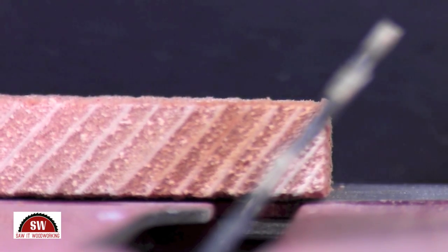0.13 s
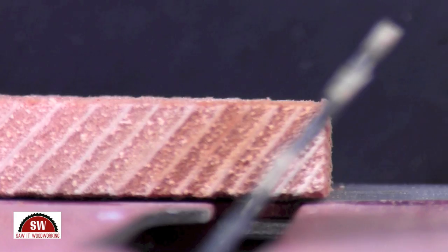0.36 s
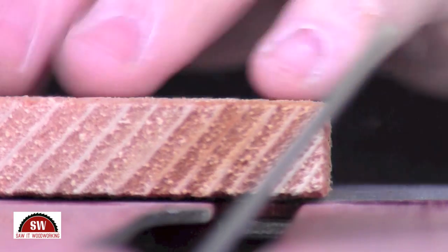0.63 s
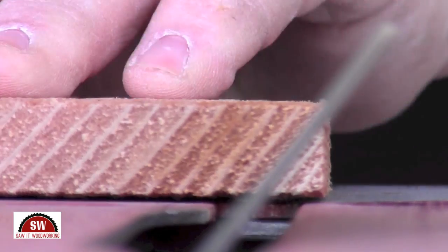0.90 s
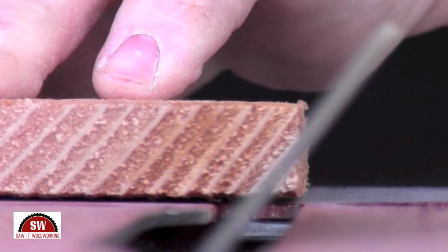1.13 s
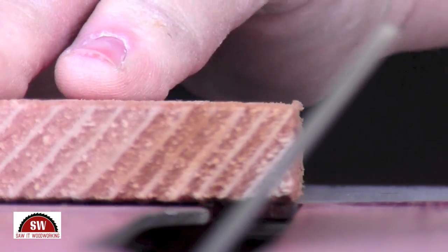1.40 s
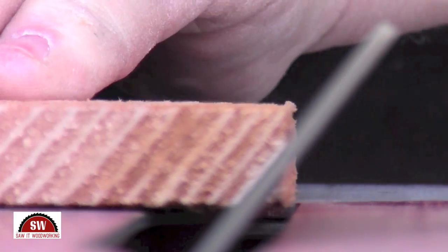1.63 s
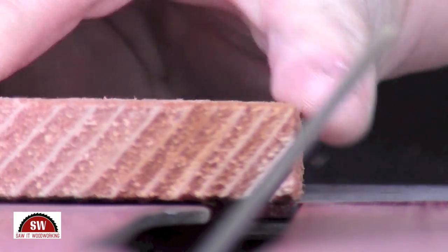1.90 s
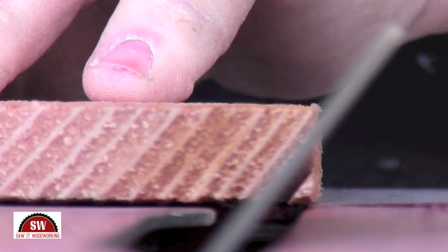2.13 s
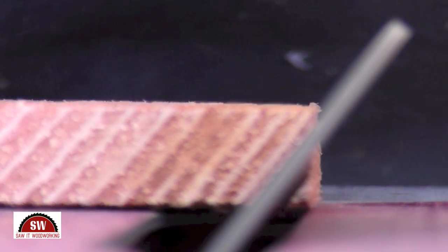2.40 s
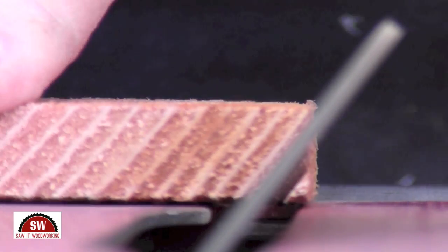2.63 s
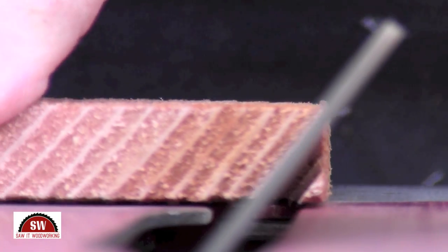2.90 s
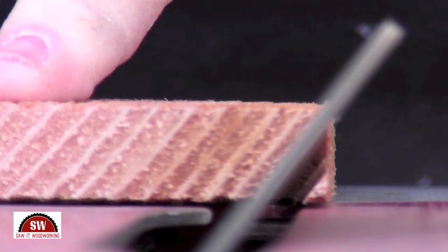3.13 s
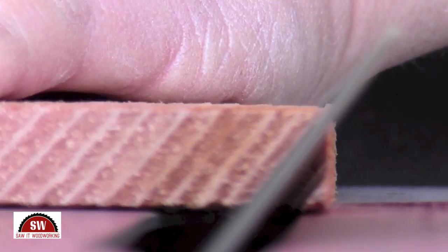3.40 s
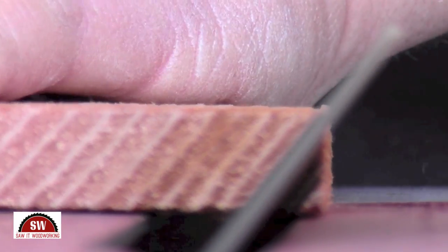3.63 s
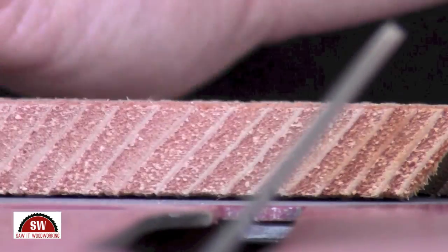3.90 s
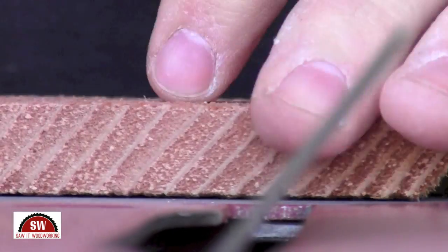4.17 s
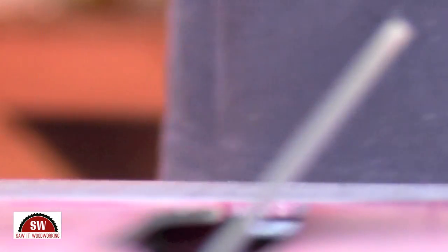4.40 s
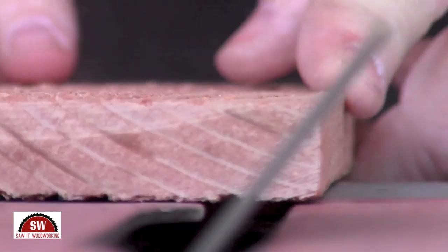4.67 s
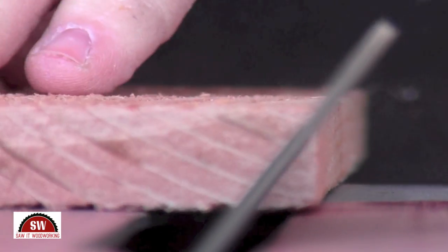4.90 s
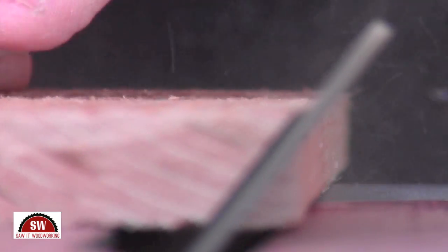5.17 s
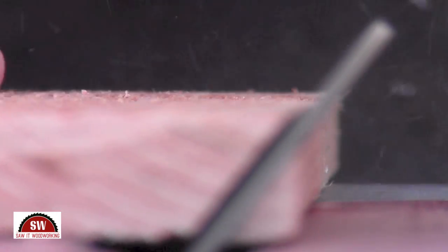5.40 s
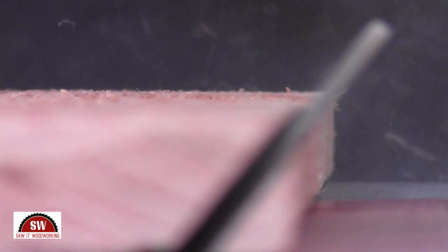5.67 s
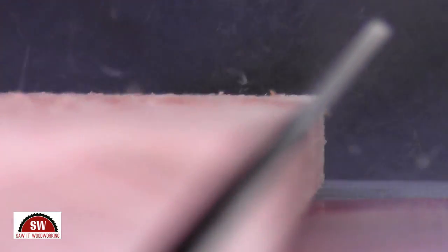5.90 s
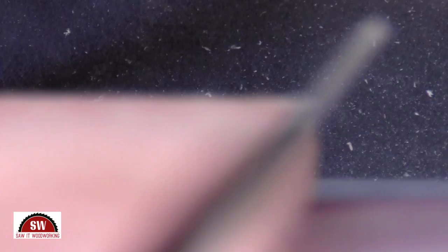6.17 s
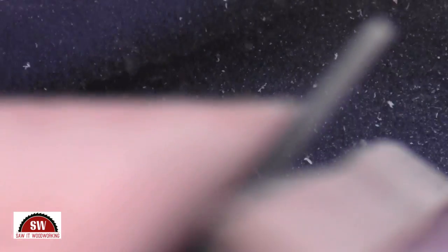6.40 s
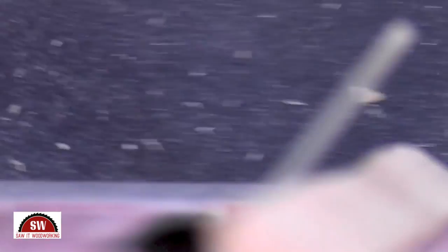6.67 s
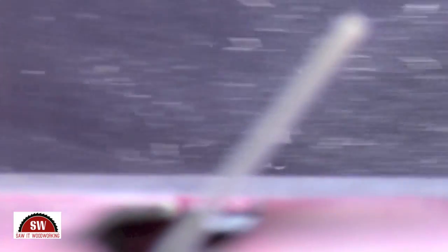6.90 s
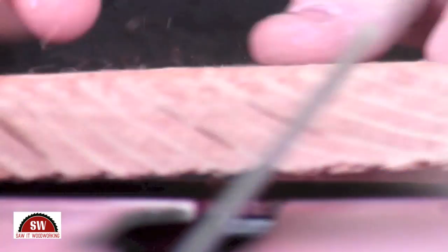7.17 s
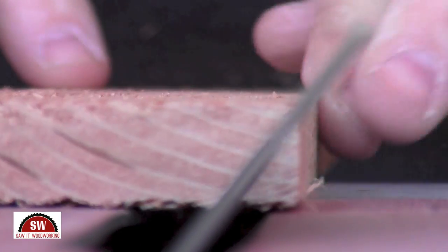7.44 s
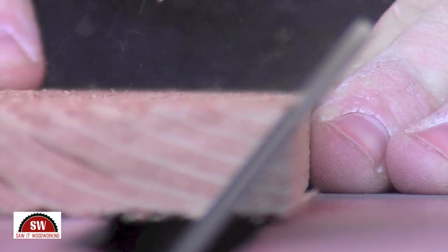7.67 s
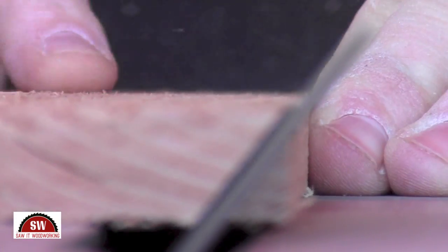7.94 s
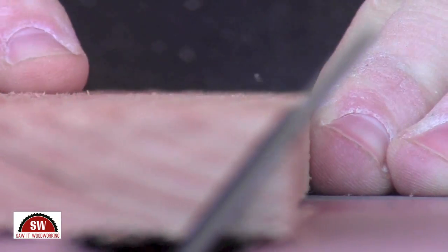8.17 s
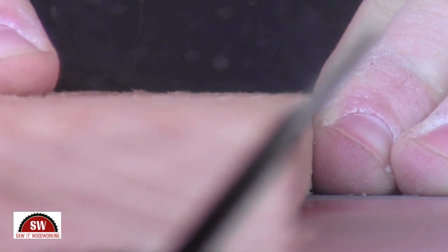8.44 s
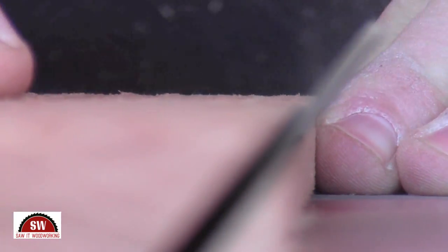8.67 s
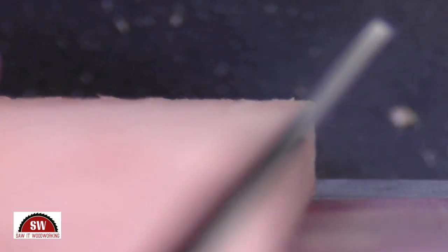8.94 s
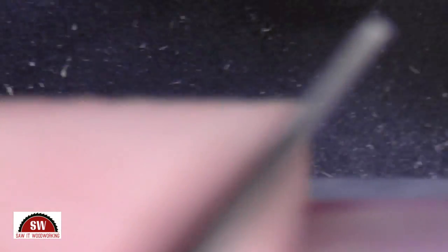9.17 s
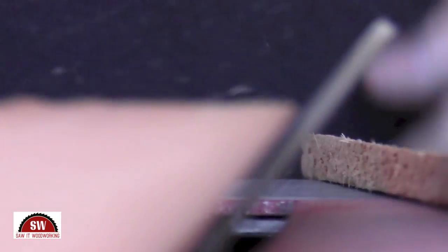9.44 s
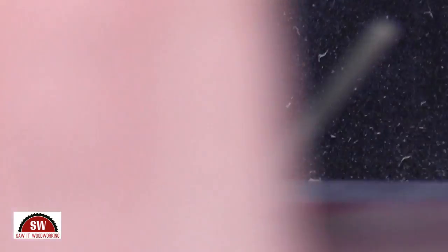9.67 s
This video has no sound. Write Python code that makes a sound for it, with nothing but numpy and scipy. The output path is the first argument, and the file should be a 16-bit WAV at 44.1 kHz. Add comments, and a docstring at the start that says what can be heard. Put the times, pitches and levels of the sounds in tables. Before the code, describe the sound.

A quiet workshop, close, dry and nearly mono. From 0 to 0.5 s there is low rumble, soft rustling, faint falling squeaks and two dull wooden knocks at about 0.2 and 0.35 s. A tiny hush follows, then a bright metallic clank at 0.59 s as a table saw kicks on. Its high whine shoots up in a fraction of a second inside a loud, bright, hissing roar of air and chips, then settles slowly, with small dips near 1.7, 2.5 and 3.5-3.9 s. From 4.9 to 6.6 s a board loads the blade: the whine sags unevenly and turns stronger and raspier, then recovers. A second cut from 7.5 to 9.4 s wavers similarly. At about 9.5 s the motor switches off; the whine glides downward amid continuing, boomier roar and brief metallic rings, ending around 9.8 s still spinning.

```python
"""A quiet workshop, heard close and dry on a nearly mono microphone pair: low rumble, two wooden knocks and
faint falling squeaks, then a hush. These are filtered noise, ringing modes and gliding partials.
A table saw kicks on with a clank; its tooth whine, sines locked to the tooth rate, climbs,
sags whenever wood loads the blade and slides down at switch-off.
Air and chips roar as noise through the resonances of cabinet and blade."""
import sys
import numpy as np
from scipy import signal
from scipy.fft import rfft, irfft, next_fast_len
from scipy.io import wavfile
from scipy.ndimage import uniform_filter1d

SR = 44100
rng = np.random.default_rng(int(sys.argv[2]) if len(sys.argv) > 2 else 0)


def makeup_ratio(level_db):
    """Linear amplitude ratio for a level in decibels (20 dB per factor of ten)."""
    decades = np.asarray(level_db, float) / 20
    return 10 ** decades


def generate_wav(sig):
    """Save sig (samples, or channels by samples) to the path in sys.argv[1] as 16-bit PCM at SR."""
    pcm = np.round(np.clip(np.atleast_2d(sig).T, -1, 1) * 32767).astype(np.int16)
    wavfile.write(sys.argv[1], SR, pcm)


N = 432621
END_S = N / SR
HUSH_S = 0.516  # the workshop sounds stop here
CLANK_S = 0.5885
ON_S, OFF_S = 0.6, 9.478  # motor switched on and off
FREE_HZ, LOADED_HZ = 3200, 3010  # tooth rate running free, and where the load counts as full


def colour(x, points, peaks=()):
    """Filter by (Hz, dB) points plus bell-shaped resonances; rms 1."""
    hz = np.maximum(np.fft.rfftfreq(x.shape[-1], 1 / SR), 1)
    f, db = np.transpose(points)
    shape = np.interp(np.log(hz), np.log(f), db)
    for centre, width, lift_db in peaks:
        shape = shape + lift_db / (1 + (2 * (hz - centre) / width) ** 2)
    y = irfft(rfft(x) * makeup_ratio(shape), x.shape[-1])
    return y / np.sqrt(np.mean(y ** 2))


def split(x, edges_hz):
    """Cut a sound into neighbouring bands that add back to the whole."""
    size = next_fast_len(x.shape[-1])
    hz, spec = np.fft.rfftfreq(size, 1 / SR), rfft(x, size)
    above = [1 / (1 + (e / np.maximum(hz, 1)) ** 8) for e in edges_hz]
    weights = -np.diff([np.ones_like(hz)] + above + [np.zeros_like(hz)], axis=0)
    return [irfft(spec * w, size)[..., :x.shape[-1]] for w in weights]


def band(hz, width):
    """Noise in one resonance; rms 1."""
    size = next_fast_len(N)
    f = np.fft.rfftfreq(size, 1 / SR)
    spec = rfft(rng.standard_normal(size))
    y = irfft(spec / (1 + (2 * (f - hz) / width) ** 2), size)[:N]
    return y / np.std(y)


def curve(rows, size=N):
    """Gate that is open while a table lasts, and the table's columns joined over time."""
    t = np.arange(size) / SR
    s, *columns = np.transpose(rows)
    gate = uniform_filter1d(1. * ((t >= s[0]) & (t <= s[-1])), 100, mode="nearest")
    return gate, [np.interp(t, s, c) for c in columns]


def walk(rate, size=N):
    """Random levels held 1 / rate s and slewed twice; spread near 1."""
    k = int(SR / rate)
    held = np.repeat(rng.standard_normal(size // k + 1), k)
    return 1.3 * uniform_filter1d(uniform_filter1d(held, k), k)[:size]


def tone(rows, wobble_hz, flutter_db, size=N):
    """A wavering partial on (s, Hz, dB rms) rows."""
    gate, (hz, db) = curve(rows, size)
    phase = 2 * np.pi * np.cumsum(hz + wobble_hz * walk(150, size)) / SR
    level = np.sqrt(2) * makeup_ratio(db + flutter_db * walk(80, size))
    return np.pad(gate * level * np.sin(phase), (0, N - size))


def flare(peak_s, half_s, hz, fall, db):
    """Rows of a short partial that swells by 14 dB, glides down and fades."""
    return [(peak_s + way * half_s, hz - way * half_s * fall, db - abs(way) * 14) for way in (-1, 0, 1)]


def strike(start, level_db, modes, rattle, rise):
    """Modes rung by a blow; rattle (dB) keeps shaking their levels as they die; rise in s."""
    t = np.maximum(np.arange(SR) / SR - start, 0)
    ring = 0
    for hz, db, t60 in modes:
        level = makeup_ratio(db + rattle * walk(119.7, size=SR))
        ring = ring + level * np.exp(-np.log(1000) * t / t60) * np.sin(2 * np.pi * hz * t)
    ring = ring * (1 - np.exp(-t / rise))
    return np.pad(makeup_ratio(level_db) * ring, (0, N - SR))


def stereo(mid, side):
    """Left and right from mid and side."""
    return np.array([mid + side, mid - side])


def spread(bed):
    """Pad a mid and side pair of noises to full length, the side turned down."""
    mid, side = np.pad(bed, ((0, 0), (0, N - bed.shape[1])))
    return stereo(mid, makeup_ratio(-10.5) * side)


def until_hush():
    """Gain that closes over the last 130 samples before the hush."""
    return np.clip((HUSH_S * SR - np.arange(N)) / 130, 0, 1)


# relative spectrum of the workshop noise: pitch_hz, density_db (per Hz)
SHOP_COLOUR = [(18, -48), (40, -22), (85, -3), (340, -13.5), (1000, -15.5), (2300, -19), (3200, -25.5),
               (8500, -31), (11500, -39), (13000, -50), (15500, -70)]
# scuffs that swell each band: start_s, rumble_db, rustle_db, hiss_db
SCUFFS = [(.199, -51, -45.5, -57), (.215, -60, -54, -50), (.245, -60, -53, -60), (.348, -47, -53.5, -67)]


def room():
    """Rumble, rustle and hiss are noise bands that swell separately and die away after each scuff."""
    t = np.arange(SR) / SR
    gains = []
    # steady level (dB) and decay after a scuff (t60 s) of rumble, rustle and hiss
    for column, (db, t60) in enumerate([(-51.5, 0.1), (-60.5, 0.56), (-70.5, 0.17)], 1):
        power = makeup_ratio(db + 2.0 * walk(26.7, SR)) ** 2
        for row in SCUFFS:
            decay_db = 60 * np.abs(t - row[0]) / t60
            power = power + (t > row[0]) * makeup_ratio(row[column] + 2.0 * walk(200, SR) - decay_db) ** 2
        gains.append(np.sqrt(power))
    gains[0] = gains[0] * np.clip((HUSH_S - t) / 0.021, 0, 1)  # rumble dies away just before the hush
    bands = split(colour(rng.standard_normal((2, SR)), SHOP_COLOUR), (700, 4000))
    bed = sum(gain * part / np.std(part) for gain, part in zip(gains, bands))
    return spread((np.arange(SR) < HUSH_S * SR) * bed)


# falling squeaks: peak_s, half_length_s, pitch_hz (at the peak), fall_hz_per_s, level_db
SQUEAKS = [(.01, .05, 2540, 1500, -47.5), (.02, 0.044, 2780, 1000, -54), (.005, 0.07, 1450, 600, -57),
           (0.081, .035, 2440, 3000, -56), (0.092, 0.021, 1090, 500, -51), (.09, .02, 5750, 1000, -65),
           (.115, .03, 2150, 1500, -60), (0.178, 0.039, 2140, 4020, -50), (0.436, .035, 2915, 3200, -55),
           (0.423, .055, 2630, 5000, -59), (.485, .025, 2690, 3500, -47.5), (.508, .022, 2600, 3490, -45)]


def squeaks():
    """Short wavering partials glide down; a fast random level makes them grainy."""
    lines = sum(tone(flare(*row), wobble_hz=24, flutter_db=3.0, size=SR) for row in SQUEAKS)
    grainy = until_hush() * (1 + 0.3 * walk(500)) * lines
    return stereo(grainy, makeup_ratio(-17) * grainy)


# knocks: start_s, level_db
KNOCKS = [(.199, -40), (0.348, -44)]
# modes of the wood: pitch_hz, level_db (relative to the knock), t60_s
WOOD = [(271, -2.5, 0.22), (351, -1, 0.23), (454, -3, .15), (630, 0, 0.065), (820, -9, 0.094),
        (1073, -6, 0.092), (1380, -3, 0.12), (2280, -14, 0.078), (3515, -15, 0.1)]


def knocks():
    """Blows ring the decaying modes of wood, in the middle of the pair."""
    return until_hush() * sum(strike(s, db, WOOD, rattle=3.7, rise=0.0025) for s, db in KNOCKS)


# relative spectrum of the hush: pitch_hz, density_db (per Hz)
HUSH_COLOUR = [(24, -60), (60, -30), (450, -24), (650, -3), (900, -2), (1200, -10), (1550, -7), (2500, -11),
               (3200, -20), (10000, -27), (15500, -28)]


def hush():
    """Faint coloured noise up to the moment the motor is switched on."""
    t = np.arange(SR) / SR
    noise = colour(rng.standard_normal((2, SR)), HUSH_COLOUR)
    return spread(makeup_ratio(-60) * noise * (t > HUSH_S) * (t < ON_S))


# modes of the start clank: pitch_hz, level_db (relative to the clank), t60_s
CLANK = [(1000, -31, .08), (1390, -22, .15), (1960, -12.5, 0.22), (2200, -20, 0.23), (2410, -8, 0.25),
         (2570, -10, 0.21), (2810, 4, 0.095), (2900, -1, 0.12), (3340, -21, .15), (3760, -12, 0.12),
         (5170, -7, .05), (6804, -12, .03)]


def clank():
    """The start rings metallic modes that rattle unevenly as they die."""
    return strike(CLANK_S, -20.5, CLANK, rattle=3.5, rise=0.0006)


# crunch of the start clank, one row: pitch_hz, width_hz, level_db, t60_s
CRUNCH = (2600, 1298, -36, 0.21)


def crunch():
    """One resonant band of noise bursts with the clank and decays."""
    hz, width, db, t60 = CRUNCH
    since = np.arange(N) / SR - CLANK_S
    return (since > 0) * makeup_ratio(db - 60 * np.abs(since) / t60 + 1.9 * walk(150)) * band(hz, width)


# wood brushes the blade: deepest_s, sag_hz, slowing_s
BRUSHES = [(1.67, 41.7, .11), (2.42, 27.83, .1), (2.62, 41.7, .1), (3.55, 50, 0.16), (3.71, 45.2, 0.081),
           (3.875, 45, 0.026)]
# two rip cuts with uneven feed, each a list of: time_s, sag_hz (of the tooth rate)
CUTS = [
    [(4.9, 0.5), (4.97, 46), (5.05, 126), (5.26, 239), (5.36, 241), (5.46, 119), (5.61, 185.5), (5.77, 140),
     (5.84, 200), (5.97, 249.5), (6.2, 191), (6.38, 176), (6.48, 71), (6.59, 14.5), (6.69, -1.5)],
    [(7.46, 1), (7.58, 81), (7.69, 157.5), (7.81, 189.5), (7.89, 119.5), (7.98, 114), (8.04, 48.5),
     (8.22, 149), (8.3, 149.5), (8.55, 195.5), (8.76, 146), (9.12, 187), (9.24, 138.5), (9.32, 60.5),
     (9.45, 4.5), (9.47, 0)],
]


def blade():
    """Gate, tooth rate and load (0 free, 1 full): fast run-up, slow warm-up, sags, exponential coast."""
    run_up_s, start_hz, coast_per_s = 0.062, 1500, 2.3
    cold_sag_hz, warm_up_s, recover_s = 55.2, 1.7, 0.11
    t = np.arange(N) / SR
    since = np.maximum(t - ON_S, 0)
    sag = cold_sag_hz * np.exp(-since / warm_up_s)
    for s, hz, slowing in BRUSHES:
        slowed = np.clip(1 + (t - s) / slowing, 0, 1)
        recovering = np.exp(-np.abs(t - s) / recover_s)
        sag = sag + hz * np.where(t < s, slowed, recovering)
    for rows in CUTS:
        sag = sag + np.interp(t, *np.transpose(rows), 0, 0)
    hz = FREE_HZ - sag - (FREE_HZ - start_hz) * np.exp(-since / run_up_s)
    hz = hz * np.exp(-coast_per_s * np.maximum(t - OFF_S, 0))
    load = np.clip(sag / (FREE_HZ - LOADED_HZ), 0, 1)
    return curve([(ON_S,), (END_S,)])[0], hz, load


# roar over time: time_s, level_db (before a fixed 2 dB lift)
ROAR_LEVEL = [(.59, -29.5), (.8, -29.5), (1.72, -30.5), (2.18, -29.5), (2.54, -30.5), (3.62, -30),
              (3.83, -30.5), (4.31, -30), (4.85, -30), (5.75, -31.5), (6.42, -31), (6.93, -29.5),
              (7.5, -30.5), (9.07, -32.5), (9.47, -30), (9.81, -29.5)]
# relative spectrum of the roar: pitch_hz, density_db (per Hz)
ROAR_COLOUR = [(18, -68), (30, -38.5), (250, -40.5), (450, -30), (640, -20.5), (1100, -20), (1900, -14.5),
               (2150, -8.5), (2700, -8.5), (3300, -8.5), (4500, -8.5), (5600, -7.5), (10000, -5.5),
               (14800, -3), (16000, -8)]
# resonances and dips of cabinet and blade: pitch_hz, width_hz, lift_db
BODY = [(1140, 300, 6.5), (1550, 125, 5.5), (2594, 380, 3.5), (2850, 87, 4), (3607, 147, 9), (3700, 89, -5),
        (6400, 420, 6), (7230, 250, 5.5), (7520, 200, -4.5), (7930, 370, 5), (8970, 420, 1.5),
        (9560, 470, 2.5), (10400, 82, -8), (11490, 1240, 4.5), (12500, 250, -5), (12900, 150, 2.5),
        (13900, 300, 0), (14100, 150, -6)]


def roar():
    """Turbulent air and chips through the body; each band flickers a little on its own."""
    gate, (level_db,) = curve(ROAR_LEVEL)
    since = np.maximum(np.arange(N) / SR - CLANK_S, 0)
    level_db = level_db + 7 * np.exp(-since / 0.0058)  # the kick
    # the cabinet booms harder at the kick and as the blade slows
    slow = np.clip(2 - 2 * blade()[1] / FREE_HZ, 0, 1) ** 2
    boom_db = -2.5 + 4 * np.exp(-since / 0.041) + 4.5 * slow + 1.0 * walk(20)
    boom_hz, boom_width_oct = 1160, 1.74
    # chips striking the guard make the noise slightly grainy
    grain = makeup_ratio(0.35 * walk(900))
    air = colour(grain * rng.standard_normal((2, N)), ROAR_COLOUR, BODY)
    edges = 500 * 2 ** np.arange(0, 5, .5)
    centres = np.append(edges[0] / 2, edges) * 2 ** .25
    out = 0
    for hz, part in zip(centres, split(air, edges)):
        boom = np.exp(-(np.log2(hz / boom_hz) / boom_width_oct) ** 2) * boom_db
        out = out + part * makeup_ratio(boom + 0.35 * walk(7.2) + 0.38 * walk(25))
    out = gate * makeup_ratio(level_db + 2.0) * out
    return stereo(out[0], makeup_ratio(-36.5) * out[1])


# how strongly the tooth tone radiates at each pitch: pitch_hz, level_db (rms, before the slow change)
TOOTH_TONE = [(1500, -44), (1590, -45), (1700, -56), (1800, -43), (2000, -49), (2120, -32), (2250, -46),
              (2390, -33), (2520, -30), (2700, -33), (2830, -33.5), (2930, -45), (2970, -45.5), (3015, -42),
              (3080, -43.5), (3130, -43.5), (3165, -40.5), (3200, -42)]
# slow change of the tooth tone: time_s, change_db
TOOTH_LEVEL = [(.8, 4), (1.5, 1), (4.3, 0.5), (4.6, -3.5), (5.3, 0.5), (5.42, 3), (5.8, 0), (6.2, -0.5),
               (7.0, -1), (7.6, -4), (8.2, -0.5), (8.4, -1), (9.48, -1.5)]
# how strongly its octave radiates: pitch_hz, level_db (rms)
OCTAVE_TONE = [(3000, -43), (3400, -44), (3590, -35), (4000, -47), (4240, -44), (4500, -56), (4770, -38),
               (5020, -38), (5400, -48), (5660, -45), (5860, -53), (5930, -45), (6030, -38), (6160, -40.5),
               (6250, -35), (6330, -37.5), (6400, -33.5)]
# how strongly the upper tooth overtones radiate: pitch_hz, level_db (rms)
OVERTONES = [(4000, -52), (5300, -41), (5900, -48), (6300, -44), (7500, -54), (9000, -56), (9450, -51),
             (9600, -44), (11000, -55), (12100, -46.5), (12700, -44), (16000, -60)]
# gear and rotor lines, as multiples of the tooth rate
GEAR_ORDERS = [.205, .41, .68, .83, 2.2, 2.56]
# the same lines: level_db (rms at free speed), added_db (at full load)
GEARS = [(-74.5, 5), (-65.5, -4), (-64, 12.5), (-58, 7), (-65, -4), (-56, 7)]


def whine():
    """Teeth chop the air: tooth rate, its octave, overtones that flare at resonances, gear lines."""
    gate, hz, load = blade()
    # weaker while the motor pulls up, in the first second only
    run_up_db = (-6 + 1.5 * walk(62)) * (hz < LOADED_HZ) * (np.arange(N) < SR)
    first_db = np.interp(hz, *np.transpose(TOOTH_TONE)) + 1.1 * walk(25)
    first_db = first_db + curve(TOOTH_LEVEL)[1][0] + run_up_db
    octave_db = np.interp(2 * hz, *np.transpose(OCTAVE_TONE)) + run_up_db + 0.81 * walk(25)
    phase = 2 * np.pi * np.cumsum(hz + 2.18 * walk(60)) / SR
    out = makeup_ratio(first_db + 0.65 * walk(70)) * np.sin(phase)
    out = out + makeup_ratio(octave_db + 0.7 * walk(90)) * np.sin(2 * phase)
    for k in (3, 4):
        overtone_db = np.interp(k * hz, *np.transpose(OVERTONES)) + 2.0 * walk(100)
        out = out + makeup_ratio(overtone_db) * np.sin(k * phase + 0.37 * walk(150))
    # gear lines are fitful and die quickly once the motor slows
    drive = (hz / FREE_HZ) ** 6
    for k, (gear_db, load_db) in zip(GEAR_ORDERS, GEARS):
        out = out + drive * makeup_ratio(gear_db + load_db * load + 2.2 * walk(15)) * np.sin(k * phase)
    return gate * np.sqrt(2) * out


# rasp of the cut: pitch_hz, width_hz, level_db (at full load)
RASP = [(2120, 200, -55), (2570, 270, -49.5), (3510, 430, -45), (7230, 200, -45), (7040, 30, -53),
        (14020, 30, -51)]
# how far board and hands cover the blade slot: time_s, cover (0-1)
COVER = [(.6, 0.3), (1.0, .2), (2.6, 0.14), (3.0, 0.14), (4.1, 0.04), (4.5, 0.73), (5.65, 0.87),
         (5.95, 0.29), (6.5, 0.47), (7.08, 0.14), (7.13, 1), (8.6, 0.86), (8.75, 0.31), (9.35, 0.39),
         (9.81, .3)]
# air whistling in the slot, moved to the upper band by cover: pitch_hz, width_hz, open_db, covered_db
SLOT_BANDS = [(4420, 560, -40, -57.5), (4866, 570, -48, -39)]


def cut():
    """The rasp of teeth in wood follows the load; the slot whistles as it is covered."""
    gate, _, load = blade()
    rasp = np.sqrt(load) * sum(makeup_ratio(db) * band(hz, width) for hz, width, db in RASP)
    cover = np.clip(curve(COVER)[1][0], 0, 1)
    slot = 0
    for hz, width, open_db, covered_db in SLOT_BANDS:
        level_db = open_db + (covered_db - open_db) * cover + 0.55 * walk(20)
        slot = slot + makeup_ratio(level_db) * band(hz, width)
    return gate * (rasp + slot)


# brief dips of the saw's level: centre_s, depth_db
DIPS = [(2.62, 3.5), (3.875, 5.5), (5.05, 1.5), (6.4, 1.5), (7.92, 1)]


def dips():
    """Gain that dips briefly, each dip a bell over time."""
    t = np.arange(N) / SR
    return makeup_ratio(-sum(db * np.exp(-((t - s) / 0.025) ** 2) for s, db in DIPS))


# brief rings near the end: peak_s, half_length_s, pitch_hz, level_db
RINGS = [(9.564, .045, 1110, -48), (9.75, .055, 1075, -45), (9.514, .045, 3577, -41),
         (9.714, .02, 3720, -42), (9.75, .04, 3540, -48)]


def rings():
    """Short partials of unchanging centre pitch swell and fade as the blade coasts."""
    return sum(tone(flare(s, half, hz, 0, db), wobble_hz=18, flutter_db=2.5) for s, half, hz, db in RINGS)


def scene():
    """The workshop, then the saw."""
    workshop = room() + squeaks() + knocks() + hush()
    saw = dips() * (roar() + whine() + cut())
    return workshop + clank() + crunch() + saw + rings()


def roll_off(x):
    """The treble ends steeply here."""
    return signal.sosfilt(signal.butter(12, 16700, fs=SR, output="sos"), x)


def record(dry):
    """The microphone pair's sound with a steep low-pass at 15600 Hz."""
    low_pass = signal.ellip(10, .2, 80, 15600, fs=SR, output="sos")
    mix = signal.sosfilt(low_pass, dry)
    return roll_off(mix)


dry = scene()
out = record(dry)
generate_wav(out)
```